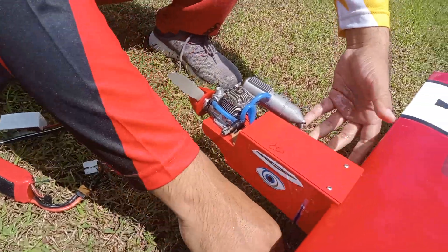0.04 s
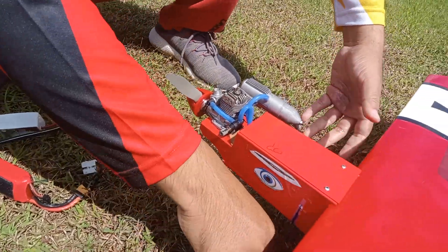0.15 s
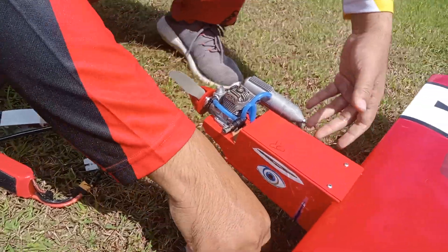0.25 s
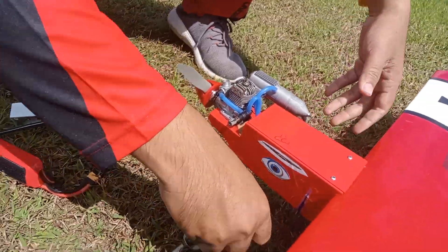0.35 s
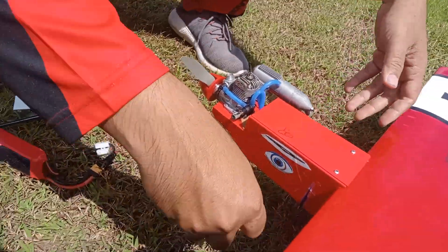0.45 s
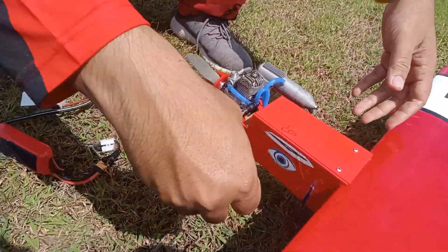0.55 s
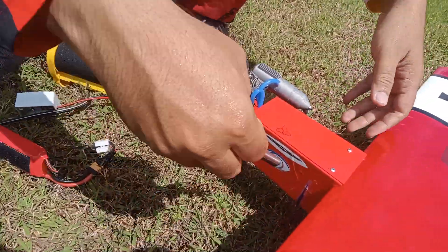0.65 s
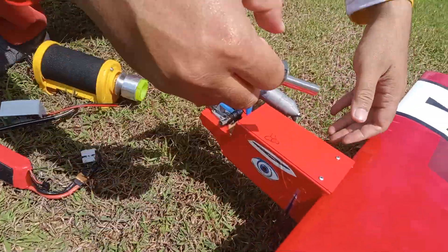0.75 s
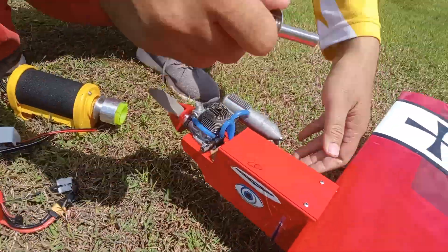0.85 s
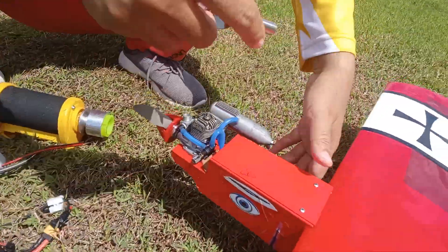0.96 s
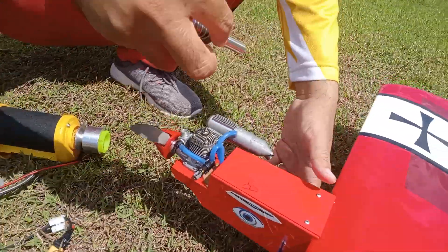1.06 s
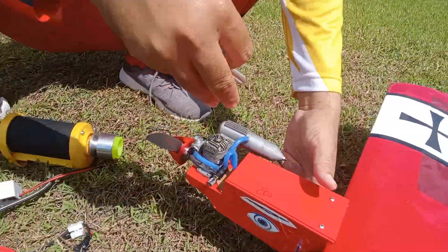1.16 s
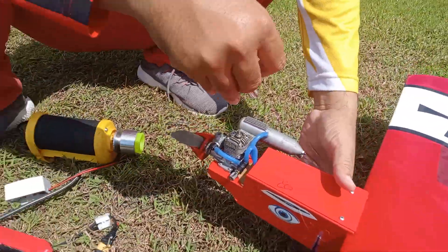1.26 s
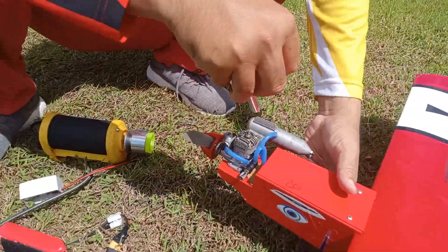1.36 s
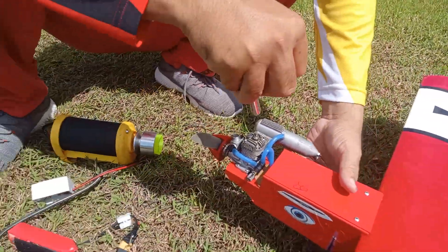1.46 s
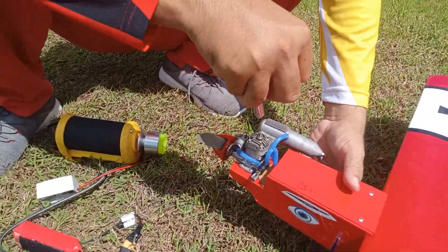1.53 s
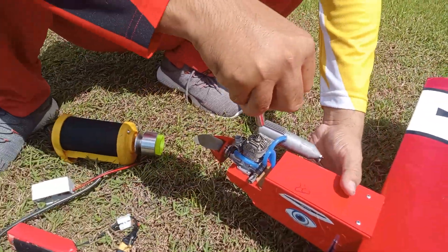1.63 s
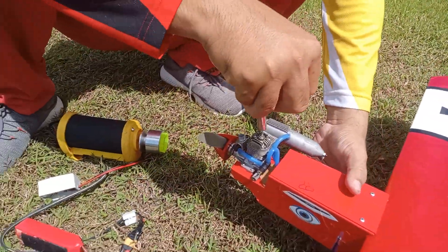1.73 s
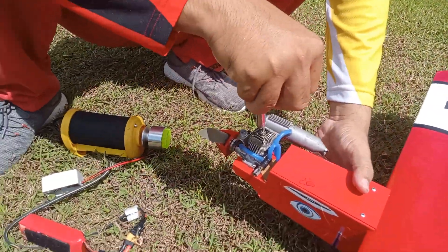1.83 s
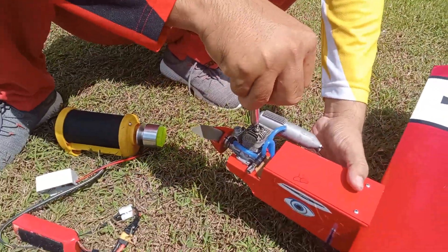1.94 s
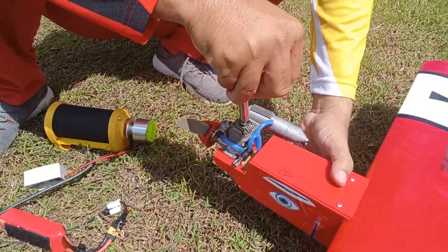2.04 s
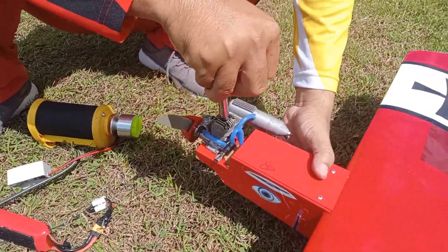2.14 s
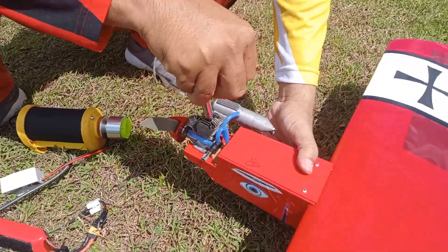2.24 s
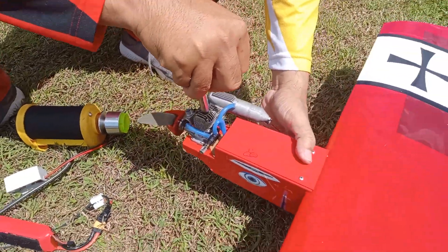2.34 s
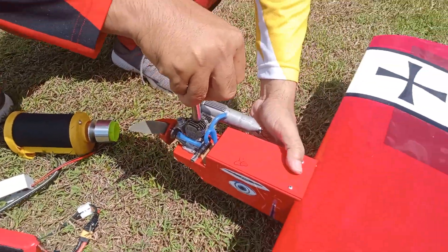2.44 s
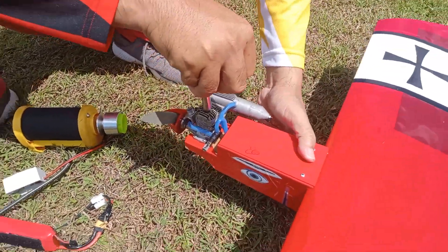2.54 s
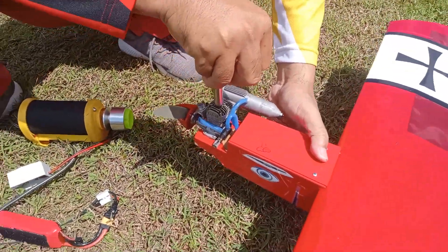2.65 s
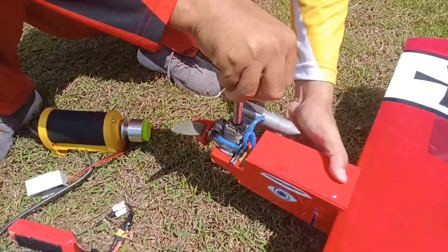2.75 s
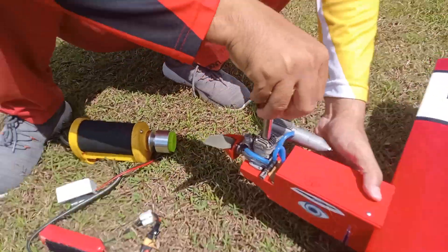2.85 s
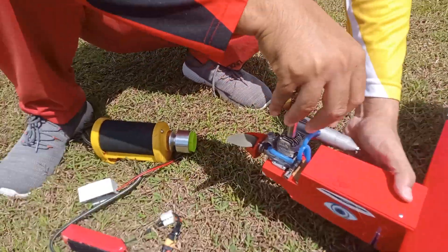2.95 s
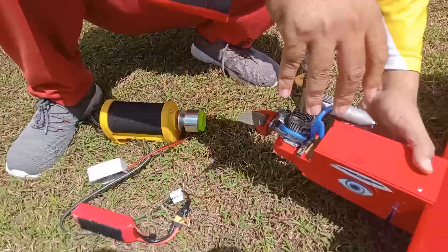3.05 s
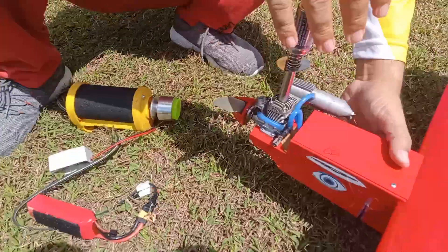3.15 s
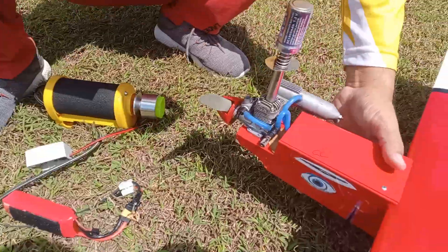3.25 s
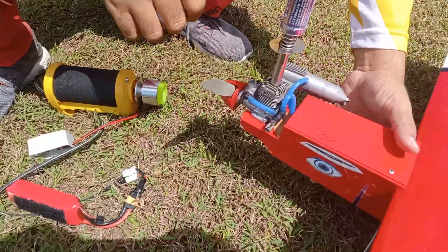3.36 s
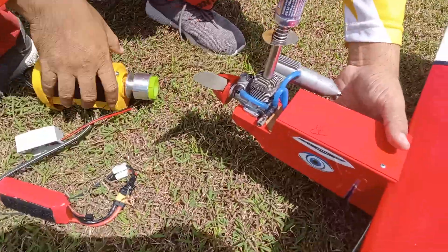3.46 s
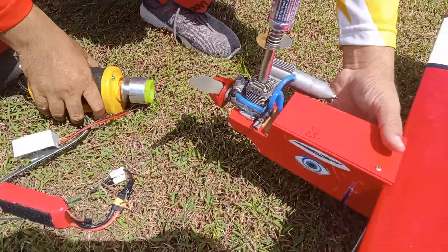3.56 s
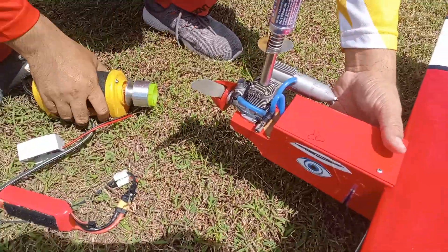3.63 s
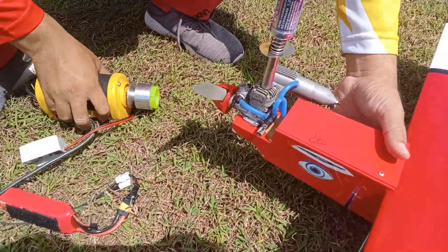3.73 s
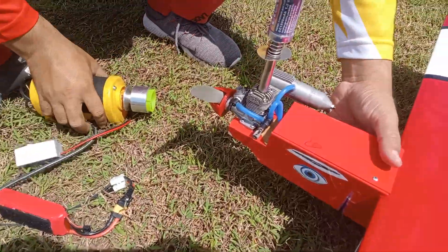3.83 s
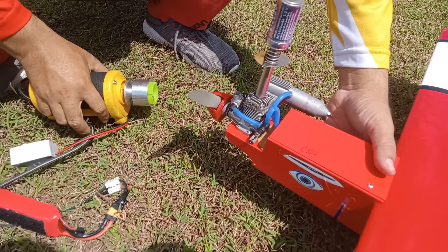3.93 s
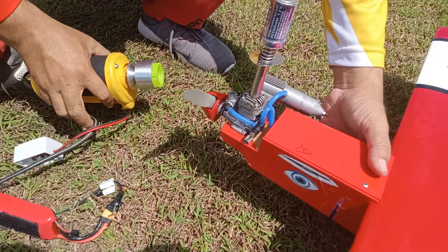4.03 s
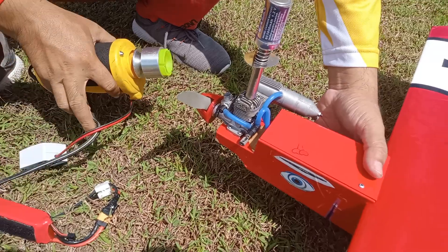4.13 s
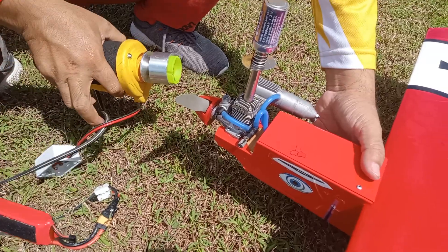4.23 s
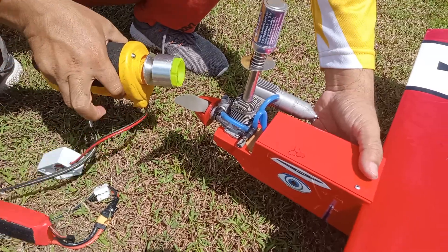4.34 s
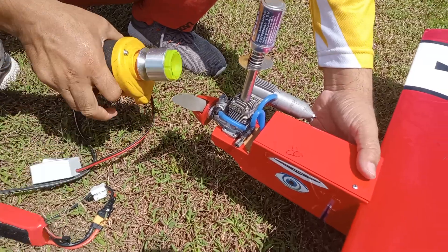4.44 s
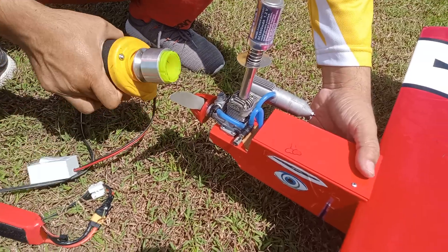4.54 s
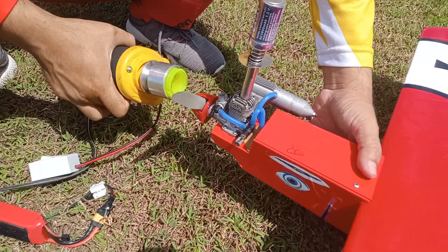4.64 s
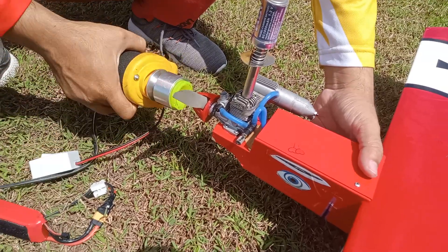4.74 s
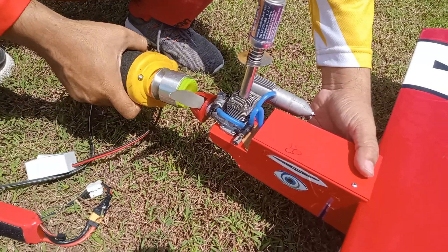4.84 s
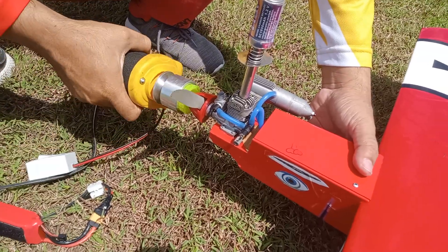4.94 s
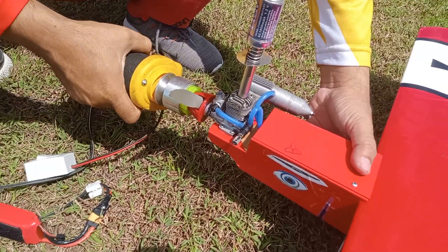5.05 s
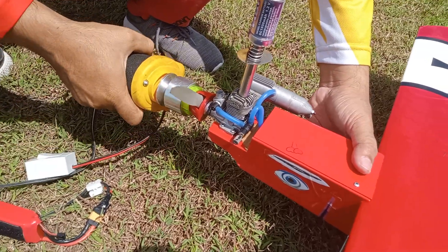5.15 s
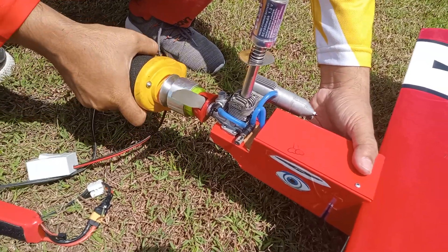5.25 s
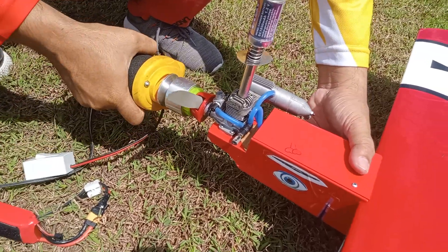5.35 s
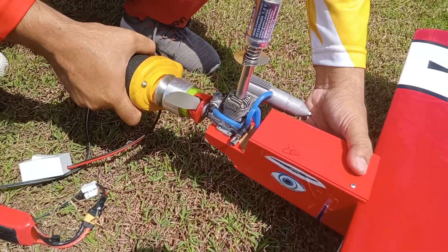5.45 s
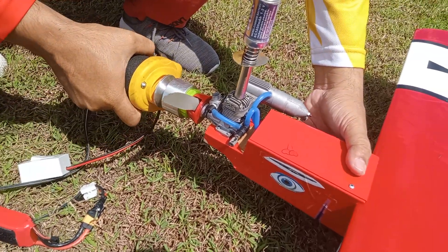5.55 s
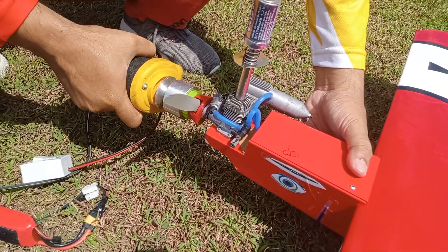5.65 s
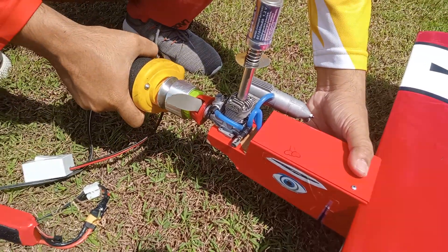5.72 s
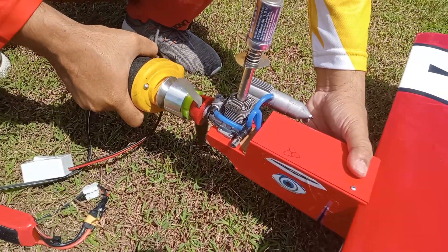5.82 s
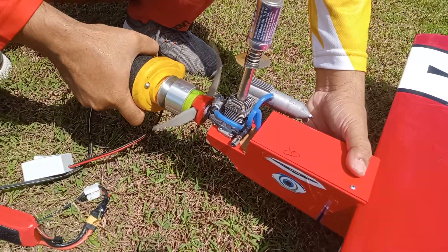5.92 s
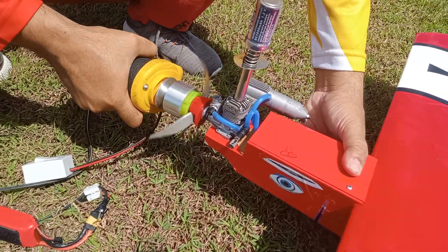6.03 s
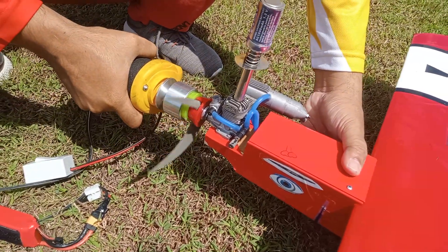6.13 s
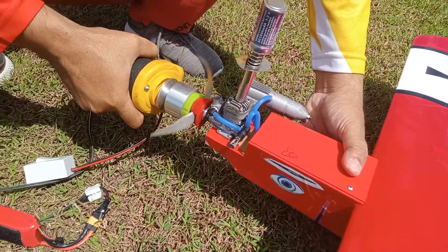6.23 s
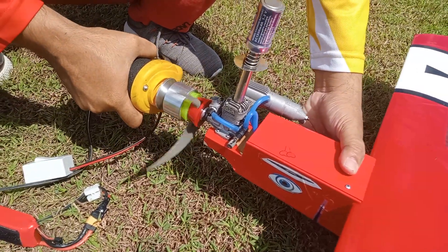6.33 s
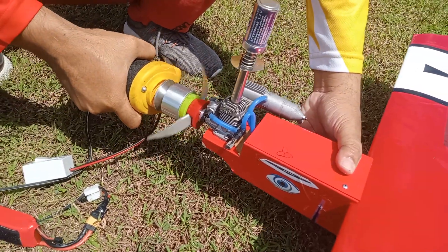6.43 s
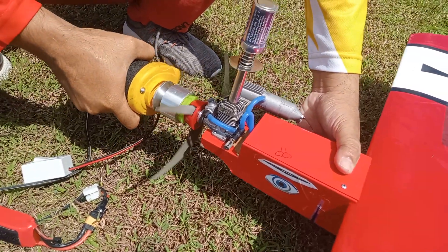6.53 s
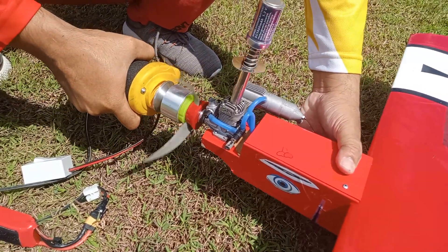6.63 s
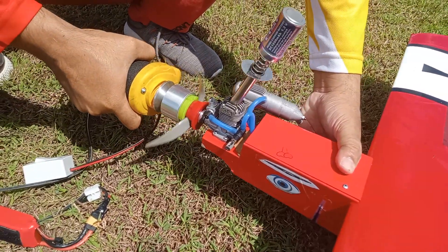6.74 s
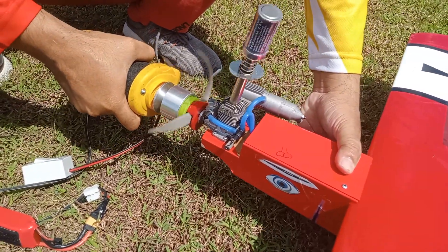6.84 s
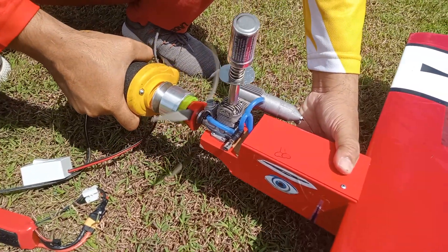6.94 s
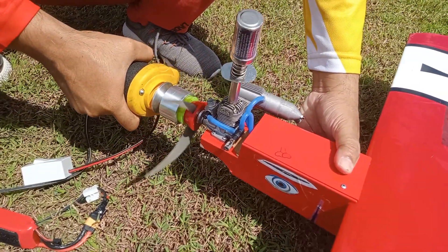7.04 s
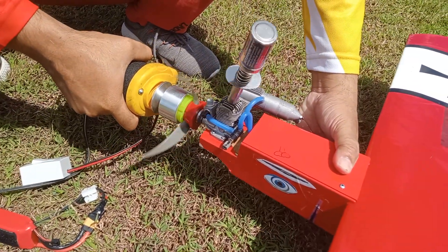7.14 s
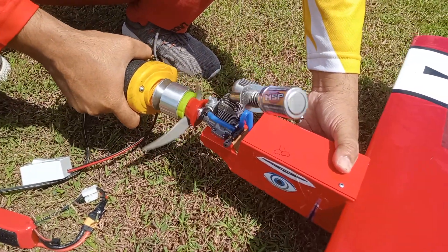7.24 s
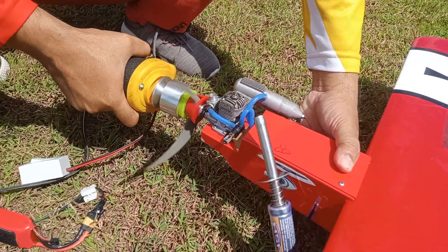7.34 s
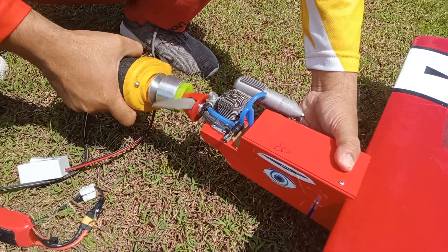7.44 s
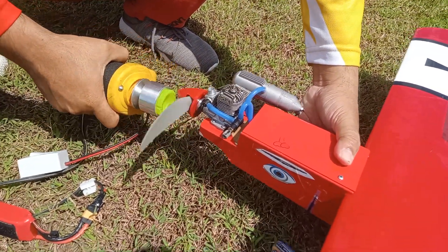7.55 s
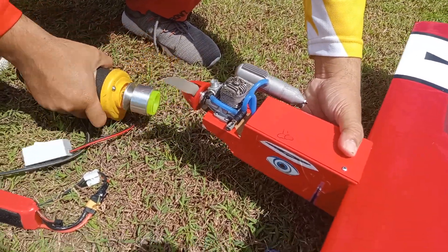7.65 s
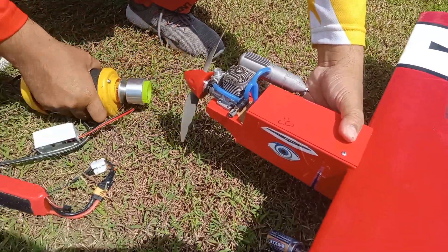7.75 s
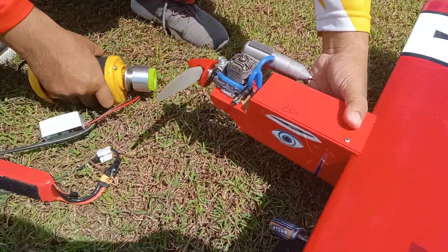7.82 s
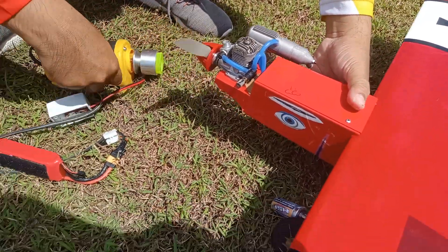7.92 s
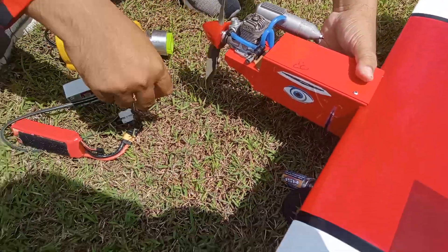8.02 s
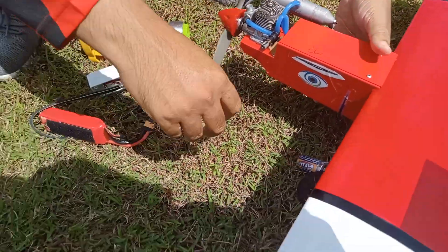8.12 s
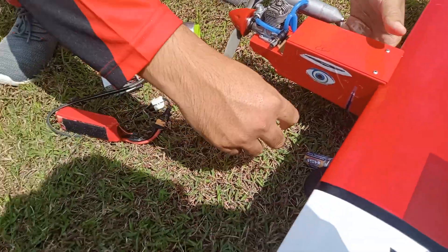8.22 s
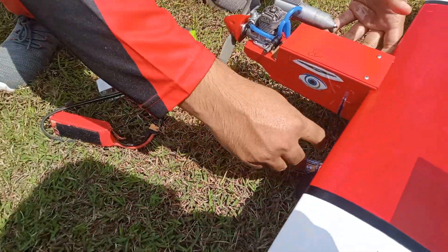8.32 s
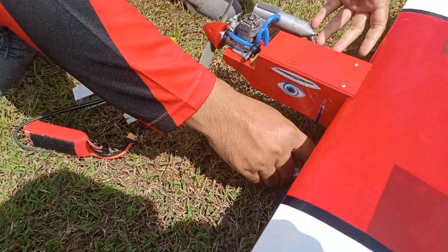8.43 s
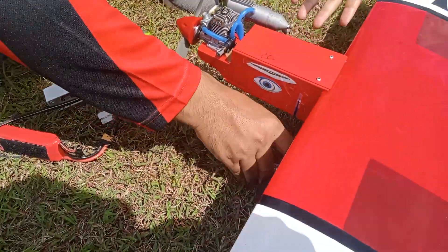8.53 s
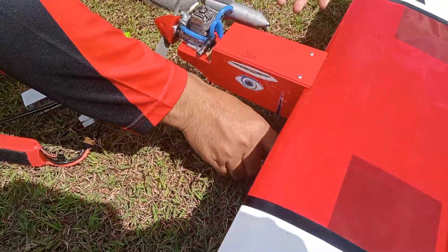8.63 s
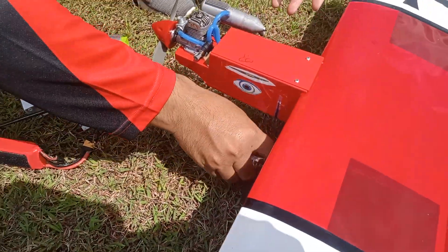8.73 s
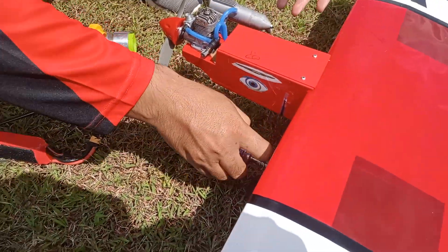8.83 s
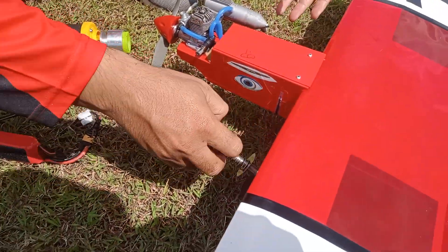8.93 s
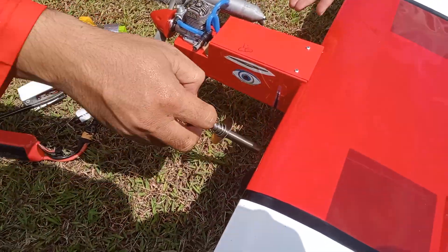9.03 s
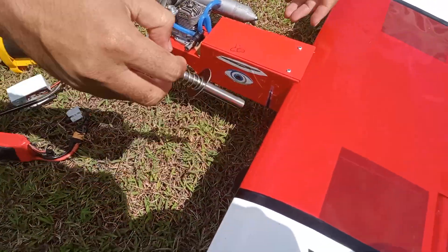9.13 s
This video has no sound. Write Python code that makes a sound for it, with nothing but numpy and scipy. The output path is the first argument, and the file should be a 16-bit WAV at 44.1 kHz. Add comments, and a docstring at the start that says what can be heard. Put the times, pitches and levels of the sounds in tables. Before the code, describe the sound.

On an open grass field, close to the microphone, sleeves and grass rustle softly with faint ticks. A loud hard clack seats an igniter on a small engine. Near quiet follows, with distant traffic and barely audible birds. Then a handheld starter spins the engine for under two seconds in a raspy low burr; metal hammers brightly and rattles free, cranking stops, and small knocks and rustling close it.

```python
"""An open grass field: a handheld electric starter cranks a small model plane engine that will not fire.
Each turn kicks resonances of intake and muffler, while noise gated by the ports hisses.
Hands clip a plug igniter to the cylinder head with a sharp knock; cranking shakes it loose, it clatters
and drops: contacts made of short noise scrapes that ring decaying modes.
Coloured noise makes sleeves and grass rustle and far traffic rumble; gliding sines are faint bird chirps."""
import sys
import numpy as np
from scipy import signal
from scipy.fft import rfft, irfft, next_fast_len
from scipy.io import wavfile
from scipy.ndimage import map_coordinates

SR = 44100
rng = np.random.default_rng(int(sys.argv[2]) if len(sys.argv) > 2 else 0)


def transcribe(u):
    """Save the signal u as a 16-bit wav file named by the first command-line argument.

    u: samples, shape (n,) or (channels, n), limited to [-1, 1]; the rate is SR.
    q: integer samples, one column per channel.
    """
    v = np.clip(np.atleast_2d(u).T, -1, 1)
    q = np.round(v * 32767).astype(np.int16)
    wavfile.write(sys.argv[1], SR, q)


N = 404827
TIME_S = np.arange(N) / SR


def amp(db):
    """Decibel law: the amplitude gain of a level in dB."""
    return 10 ** (np.asarray(db) / 20)


def unit(x):
    """Power normalization: x at rms 1."""
    return x / np.sqrt(np.mean(x ** 2) + 1e-20)


def curves(rows):
    """Linear interpolation: one value per sample for each column after the time."""
    knots_s, *columns = np.transpose(rows)
    return [np.interp(TIME_S, knots_s, column) for column in columns]


def wobble(rate_hz):
    """Slow random modulation: a smooth curve through rate_hz random knots a second."""
    knots = rng.standard_normal(int(N * rate_hz / SR) + 4)
    return map_coordinates(knots, [np.arange(N) * rate_hz / SR])


def filtered(x, response):
    """Linear filtering: the spectrum of x times a complex response of frequency."""
    m = next_fast_len(N + SR // 2)
    return irfft(rfft(x, m) * response(np.fft.rfftfreq(m, 1 / SR)), m)[..., :N]


def resonant(x, modes):
    """Forced resonance: x through causal bandpass modes; a unit impulse comes out with peak 1."""
    def response(hz):
        total = 0
        for k, (centre_hz, width_hz, db) in enumerate(modes):
            damping = 1j * hz * width_hz
            band = damping / (centre_hz ** 2 - hz ** 2 + damping)
            total = total + (-1) ** k * amp(db) * band
        return total

    impulse_response = filtered(signal.unit_impulse(N), response)
    return filtered(x, response) / np.max(np.abs(impulse_response))


def noise(spectrum, grainy_db):
    """Spectral shaping: coloured noise of rms 1, made grainy by a fast random gain."""
    knots_hz, db = np.transpose(spectrum)
    grains = rng.standard_normal(N) * amp(grainy_db * wobble(300))
    return unit(filtered(grains, lambda hz: amp(np.interp(np.log(hz + 1), np.log(knots_hz), db))))


# the cranking: start_s, burble_db, puff_over_burble_db [s, dB, dB]
CRANKING = [(5.945, -47, 6), (5.965, -32, 10.5), (6.1, -23, 4), (6.3, -21.5, 2.5), (6.5, -24.5, -0.5),
            (6.7, -29.5, 6), (6.725, -38, 5), (6.78, -31, 1.5), (7.24, -31.5, 3.5), (7.3, -26.5, -4),
            (7.44, -28.5, 5), (7.56, -33, 5.5), (7.585, -35.5, 1)]
# the engine rocks back once more: start_s, peak_db [s, dB]
ROCK_BACK = (7.612, -23)


def engine():
    """Superposition: intake burble, port hiss and muffler puffs share one shaft phase."""
    turn, on, rough = shaft()
    burble_db, puff_over_db = curves(CRANKING)
    start_s, strikes = HAMMERING[-1][:2]  # the long bout
    half_bout_s = strikes / curves(SHAFT_SPEED)[0] / 2
    hammering = np.abs(TIME_S - start_s - half_bout_s) < half_bout_s
    hiss_db = burble_db + 0.5 * hammering  # dB more while the igniter hammers
    puffs = amp(burble_db + puff_over_db) * exhaust(turn, on, rough)
    burble = amp(burble_db) * intake(turn, on, rough)
    hiss = amp(hiss_db) * port_hiss(turn, on, rough)
    last_s, last_db = ROCK_BACK
    last_puff = amp(last_db) * resonant(signal.unit_impulse(N, round(last_s * SR)), MUFFLER)
    sound = on * (puffs + burble + hiss) + last_puff
    # so small an engine radiates no deep bass: first-order highpass at 70 Hz
    return filtered(sound, lambda hz: 1j * hz / (70 + 1j * hz))


# shaft: start_s, speed_hz [s, turns per s]
SHAFT_SPEED = [(5.94, 23.3), (6.05, 40.99), (6.13, 45.74), (6.22, 47.22), (6.45, 47.06), (6.85, 45.28),
               (7.2, 45.4), (7.42, 43.8), (7.63, 36.0)]
# turbulence: start_s, share [s, 0-1]
TURBULENCE = [(5.94, 0.25), (6.5, 0.28), (6.8, 0.42), (7.25, 0.42), (7.3, 0.88)]


def shaft():
    """Rotation: phase in turns is the running sum of speed; also the cranking gain and turbulence share."""
    speed, = curves(SHAFT_SPEED)
    rough, = np.clip(curves(TURBULENCE), 0, 1)
    fade = np.clip((SHAFT_SPEED[-1][0] - TIME_S) / 0.067, 0, 1)  # the last 67 ms
    on = (TIME_S > CRANKING[0][0]) * fade
    turn = 0.76 + np.cumsum(speed * (TIME_S > SHAFT_SPEED[0][0])) / SR
    return turn, on, rough


def kick(turn, on, rough, lag):
    """Periodic excitation: an impulse each turn, its timing and strength jittered by turbulence."""
    turns_done = np.floor(turn + lag + 0.02 * rough * wobble(40))
    return np.diff(turns_done, prepend=0) * (on > 0) * amp(2.5 * rough * wobble(50))


def level(x, on):
    """Power normalization: x at rms 1 over the cranking."""
    return x / np.sqrt(np.mean(x[on > 0] ** 2))


def swirl(turn, on, modes):
    """Turbulent excitation: noise swelling gently once a turn drives resonances."""
    gate = np.exp(0.26 * (np.cos(2 * np.pi * (turn + 0.069)) - 1))
    return level(resonant(gate * rng.standard_normal(N), modes), on)


# muffler resonances: pitch_hz, width_hz, level_db [Hz, Hz, relative dB]
MUFFLER = [(198.3, 47, 10), (293, 128, 3), (88, 40, -9.5)]


def exhaust(turn, on, rough):
    """Cavity resonance: steady strokes give clean lines, turbulence smears them."""
    steady = level(resonant(-kick(turn, on, rough, 0.177), MUFFLER), on)
    smeared = swirl(turn, on, [(250, 250, 0)])
    return np.sqrt(1 - rough ** 2) * steady + rough ** 2 * smeared


# air in the carburettor: pitch_hz, width_hz, level_db [Hz, Hz, relative dB]
INTAKE = [(630, 226, 8), (435, 150, 2.5), (778, 120, 1.5), (1280, 420, -6.5)]


def intake(turn, on, rough):
    """Air-column resonance: the carburettor's air is kicked three times each turn."""
    kicks = kick(turn, on, rough, 0.56)
    kicks = kicks + 1.12 * kick(turn, on, rough, 0.38)
    kicks = kicks + 1.3 * kick(turn, on, rough, 0.2338)
    steady = level(resonant(kicks, INTAKE), on)
    return np.sqrt(1 - rough ** 1.5) * steady + rough ** 0.75 * swirl(turn, on, INTAKE)


# air through the ports: pitch_hz, level_db [Hz, relative dB per Hz]
PORT_AIR = [(760, -17), (1300, -15.5), (1940, -12), (2490, -2.5), (3420, -9.5), (4400, -10), (6350, -36.5),
            (9270, -20), (11900, -28.5), (13500, -24.5), (15500, -34), (16000, -22)]
# igniter modes: pitch_hz, width_hz, level_db [Hz, Hz, relative dB]
IGNITER = [(2487, 240, 28.5), (2740, 345, 21), (2100, 540, 12), (4000, 640, -15.5), (1500, 220, -25)]


def port_hiss(turn, on, rough):
    """Jet noise: the port jet comes once a turn; the shaken igniter buzzes between strokes too."""
    ports = np.clip(0.5 + 1.1 * np.cos(2 * np.pi * (turn + 0.19)), 0, 1)
    stroke = (1 - rough) * ports * amp(1.3 * wobble(45))
    leak = 0.17 + 0.7 * rough ** 2
    jet = level((leak + stroke) * noise(PORT_AIR, grainy_db=2.0), on)
    shaking = amp(3.7 * wobble(120)) * rng.standard_normal(N)
    return jet + 0.49 * level(resonant(shaking, IGNITER), on)


# loose igniter on the cylinder head, once a turn: start_s, strikes, click_db, fins_db
# [s of first strike, count, mean peak dB, peak dB]
HAMMERING = [(5.962, 1, -14.5, -25), (6.7296, 1, -4.5, -15), (6.8962, 4, -13.5, -38), (7.2815, 7, -5, -8),
             (7.2928, 7, -17.5, -20)]
# uneven rattle off its seat: start_s, click_db [s, peak dB]
RATTLE = [(7.457, -5.5), (7.484, -9), (7.4969, -1.5), (7.5149, -7.5), (7.5298, -6), (7.5523, -12.5),
          (7.607, -21), (7.637, -32)]
# cylinder head modes: pitch_hz, width_hz, level_db [Hz, Hz, relative dB]
FINS = [(3910, 360, 14.5), (4860, 200, -28)]
# bright snap of a contact: pitch_hz, width_hz, level_db [Hz, Hz, relative dB]
SNAP = [(9280, 960, -1), (13700, 2800, 4)]


def clatter():
    """Repeated impact: the igniter hammers with the shaft, then rattles free."""
    def turn_s(s):
        return 1 / np.interp(s, *np.transpose(SHAFT_SPEED))

    contacts = []
    for first_s, strikes, click_db, fins_db in HAMMERING:
        for k in range(round(strikes)):
            middle_s = first_s + k * turn_s(first_s) / 2  # where the mean speed is read
            strike_s = first_s + k * turn_s(middle_s)
            contacts.append((strike_s, click_db + rng.normal(0, 1), fins_db, click_db - 12))
    for s, click_db in RATTLE:
        contacts.append((s, click_db, click_db - 23, click_db - 20.5))  # fins and snap under the click
    return blows(contacts, (IGNITER, FINS, SNAP), rise_ms=2, fall_ms=2.1, vary_db=2)


# igniter and starter against the model: start_s, click_db, fuselage_db [s, peak dB, peak dB]
KNOCKS = [(0.7205, -40.5, -40), (1.9097, -47, -32.5), (2.0815, -39.5, -47), (2.2638, -28.5, -25.5),
          (2.4238, -32, -34), (2.4418, -34.5, -36), (2.519, -44, -41), (2.606, -38, -43.5),
          (2.798, -6.5, -5), (2.82, -25.5, -23.5), (2.8523, -11.5, -22), (2.8769, -42, -28.5),
          (2.9418, -21.5, -42), (2.96, -24, -41), (4.509, -35.5, -47), (5.023, -30, -48),
          (5.0372, -30.5, -50), (7.6586, -11, -29.5), (7.67, -20, -33), (7.7133, -14, -40),
          (7.7305, -32, -43.5), (8.0424, -22.5, -34), (8.455, -30, -39), (8.7452, -41, -45.5)]
# fuselage modes: pitch_hz, width_hz, level_db [Hz, Hz, relative dB of the first swing]
FUSELAGE = [(380, 85, 2), (230, 80, -2), (570, 60, -13), (720, 120, -8), (950, 110, -3), (1350, 300, -16)]


def knocks():
    """Coupled impact: each contact rings the igniter and fuselage, with a snap 28 dB under the click."""
    contacts = [(s, click_db, body_db, click_db - 28) for s, click_db, body_db in KNOCKS]
    return blows(contacts, (IGNITER, FUSELAGE, SNAP),
                 rise_ms=0.25, fall_ms=2.2, vary_db=2.5, chatter_db=-29, chatter_ms=20)


# bright ticks: start_s, level_db [s, peak dB]
TICKS = [(0.468, -44), (.6066, -43.5), (.624, -43), (.6728, -29.5), (.91, -34.5), (1.0916, -30),
         (1.149, -37), (2.4244, -30), (2.606, -30.5), (2.798, -21), (4.2235, -45), (4.255, -45),
         (4.5096, -37), (7.6586, -23.5), (8.043, -34.5)]


def ticks():
    """Brief impact: a bright snap with a ring near 4 kHz, 5 dB under it."""
    contacts = [(s, db, db - 5) for s, db in TICKS]
    return blows(contacts, (SNAP, FINS), rise_ms=0.25, fall_ms=2.2, vary_db=2)


# soft bumps in the grass: start_s, level_db [s, peak dB]
THUDS = [(7.745, -36), (7.837, -37.5), (7.99, -41), (9.006, -41)]
# turf mode: pitch_hz, width_hz, level_db [Hz, Hz, relative dB]
TURF = [(273, 94, 0)]


def thuds():
    """Damped impact: a soft bump rings one broad, low mode of the turf."""
    return blows(THUDS, (TURF,), rise_ms=2.2, fall_ms=4, vary_db=0)


def blows(events, bodies, rise_ms, fall_ms, vary_db, chatter_db=-60, chatter_ms=12):
    """Modal impact: a short ragged scrape, then chatter, rings each body's modes at varied strengths."""
    t = np.arange(SR // 8) / SR
    t_ms = 1000 * t
    chatter = amp(chatter_db) * np.exp(-(t_ms / chatter_ms) ** 2)
    shape = (1 - np.exp(-t_ms / rise_ms)) * (np.exp(-t_ms / fall_ms) + chatter)
    out = np.zeros(N + SR)
    for s, *levels_db in events:
        for modes, peak_db in zip(bodies, levels_db):
            ring = np.zeros(len(t))
            for hz, width_hz, db in modes:
                strength = amp(db + vary_db * rng.standard_normal())
                ring += strength * np.exp(-np.pi * width_hz * t) * np.sin(2 * np.pi * hz * t)
            # a soft onset paced by the first mode softens the treble; a difference holds back the bass
            radiated = np.diff(ring * np.tanh(2 * modes[0][0] * t) ** 2)
            hit = signal.fftconvolve(shape * rng.standard_normal(len(t)), radiated)
            out[round(s * SR):][:len(hit)] += amp(peak_db) * hit / np.max(np.abs(hit))
    return out[:N]


# hands, sleeves and grass on the move: start_s, swish_db, treble_db [s, dB, dB, before the grain]
RUSTLE = [(0, -57.5, -66), (0.6, -54, -64.5), (0.72, -60.5, -69.5), (0.86, -60.5, -69), (0.9, -53, -59.5),
          (1.15, -50.5, -53.5), (1.2, -57.5, -63.5), (2.0, -57.5, -60.5), (2.45, -51, -51.5),
          (3.0, -50, -51.5), (3.07, -57.5, -71.5), (3.6, -67.5, -76), (3.66, -63, -68.5),
          (4.33, -60.5, -63.5), (4.42, -64, -69), (4.52, -58, -63), (4.62, -67, -75), (5.15, -60, -80),
          (5.3, -69.5, -80), (5.9, -65, -80), (7.6, -47.5, -57), (7.76, -51.5, -66), (7.8, -50, -52.5),
          (8.0, -53, -59.5), (8.24, -43.5, -50), (8.3, -51, -59), (8.44, -52, -54.5), (8.49, -61, -68),
          (8.9, -65, -72.5), (9.15, -54.5, -69)]
# swish spectrum: pitch_hz, level_db [Hz, relative dB per Hz]
SWISH = [(650, -38.5), (1100, -15.5), (1560, -11.5), (2620, 1.5), (4360, -7), (5590, -22.5), (7000, -35.5),
         (9100, -50.5), (15400, -120)]
# treble spectrum: pitch_hz, level_db [Hz, relative dB per Hz]
FIZZ = [(3240, -34), (5500, -10), (7660, -7), (9320, -1.5), (14900, -14), (16000, -6)]


def rustle():
    """Friction noise: cloth and grass swish in grains with stray crackles, the treble on its own swell."""
    swish_db, fizz_db = curves(RUSTLE)
    crackles_per_s, crackle_db = 10, 1  # stray stalks: mean rate, mean level over the swish
    stalks = (rng.random(N) < crackles_per_s / SR) * amp(crackle_db + 2.7 * rng.standard_normal(N))
    decay = np.exp(-np.arange(SR // 100) / (0.0017 * SR))  # 1.7 ms
    crackles = np.convolve(stalks, decay)[:N]
    grain = amp(1.2 * wobble(9.4)) * (1 + crackles)
    swish = amp(swish_db) * noise(SWISH, grainy_db=1.0)
    fizz = amp(fizz_db) * noise(FIZZ, grainy_db=0.5)
    return grain * (swish + fizz)


# far traffic: start_s, rumble_db, murmur_db [s, dB, dB, before the wobble]
TRAFFIC = [(0.0, -60, -62), (7.54, -54.5, -65), (9.18, -56.5, -58)]
# rumble spectrum: pitch_hz, level_db [Hz, relative dB per Hz]
RUMBLE = [(15, -65), (25, -47.5), (46, -11.5), (81, 2), (118, -3.5), (151, -3), (220, -25), (290, -54),
          (480, -120)]
# murmur spectrum: pitch_hz, level_db [Hz, relative dB per Hz]
MURMUR = [(110, -56.5), (180, -3.5), (384, -6), (539, -11), (684, -10), (1600, -24.5), (2080, -61),
          (3520, -120)]


def traffic():
    """Distant broadband noise: far traffic as a lumpy rumble under a smooth murmur."""
    rumble_db, murmur_db = curves(TRAFFIC)
    rumble = amp(rumble_db + 3.4 * wobble(4.5)) * noise(RUMBLE, grainy_db=-1.4)
    murmur = amp(murmur_db + wobble(3.1)) * noise(MURMUR, grainy_db=0.45)
    return rumble + murmur


# falling bird chirps: start_s, length_s, pitch_hz, level_db [s, s, Hz at the start, peak dB]
BIRDS = [(3.54, .07, 4500, -69), (3.9, .06, 4600, -71), (3.98, .07, 3750, -71), (4.89, .08, 4500, -69),
         (5.07, .04, 4950, -68), (5.14, .12, 4200, -71), (5.85, .05, 5250, -69)]


def birds():
    """Frequency glide: far whistles whose pitch slides down by 8.3 %."""
    out = np.zeros(N)
    for s, length_s, start_hz, db in BIRDS:
        u = np.linspace(0, 1, round(length_s * SR))
        phase = 2 * np.pi * np.cumsum(start_hz * (1 - 0.083 * u)) / SR
        out[round(s * SR):][:len(u)] += amp(db) * np.sin(np.pi * u) * np.sin(phase)
    return out


def scene():
    """Linear superposition: all sources on the open field, one microphone."""
    contacts = clatter() + knocks() + ticks() + thuds()
    return (engine() + contacts + rustle() + traffic() + birds())[None]


def record(dry):
    """Saturation and band limiting: peaks bend softly towards 0.88, then a steep lowpass."""
    held = dry / (1 + np.abs(dry / 0.88) ** 6) ** (1 / 6)
    top_hz = 15700
    return filtered(held, lambda hz: 1 / (1 + (hz / top_hz) ** 160))


dry = scene()
out = record(dry)
transcribe(out)
```